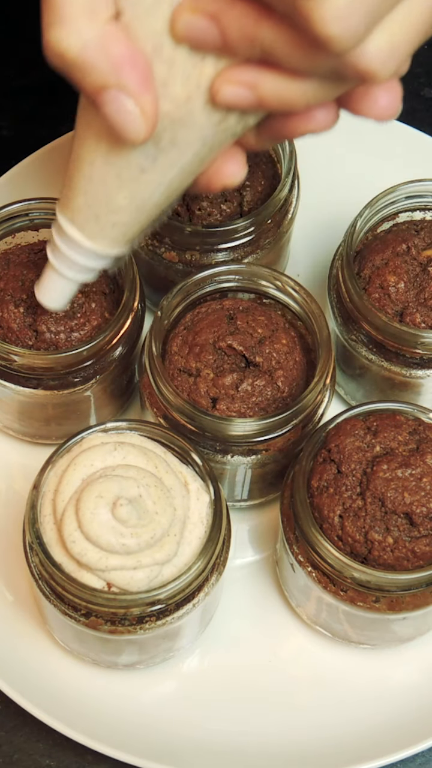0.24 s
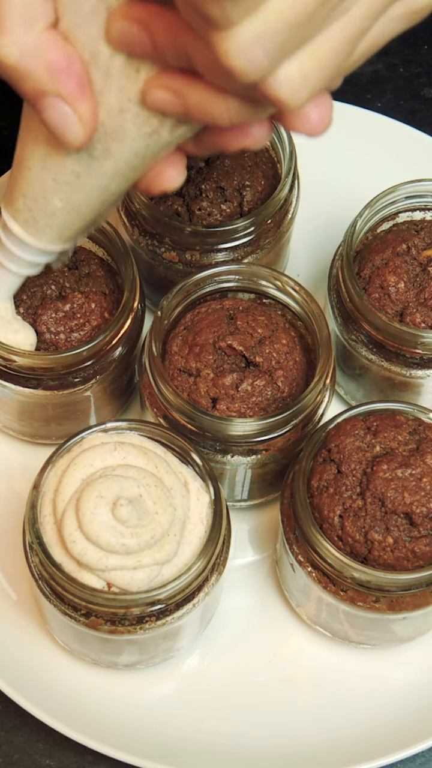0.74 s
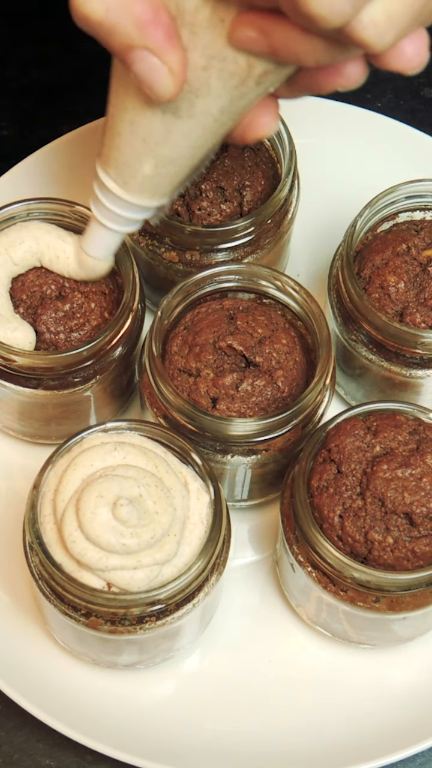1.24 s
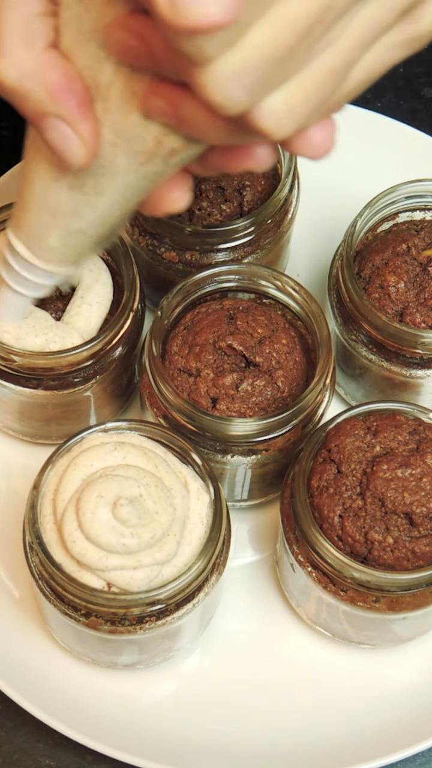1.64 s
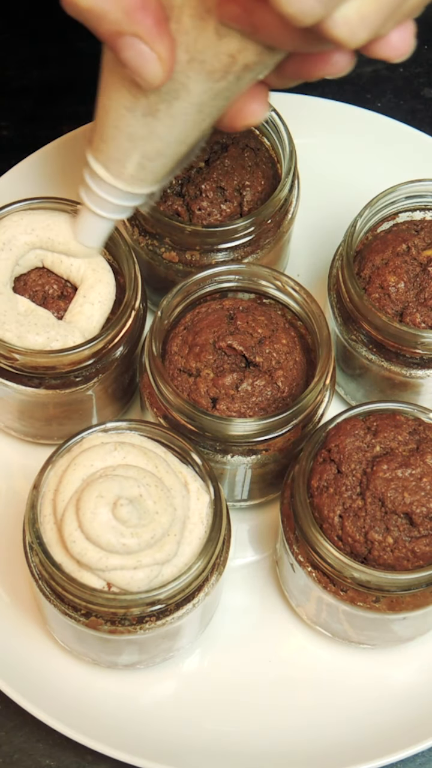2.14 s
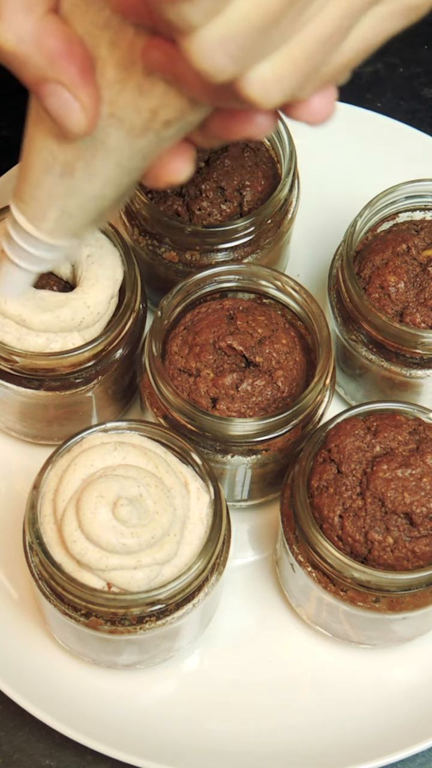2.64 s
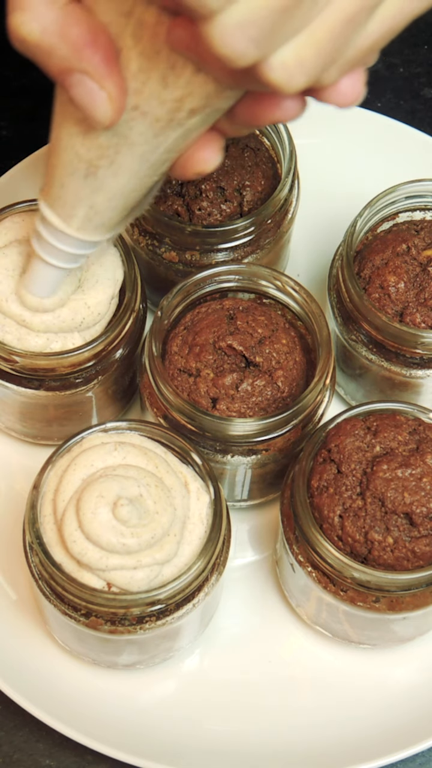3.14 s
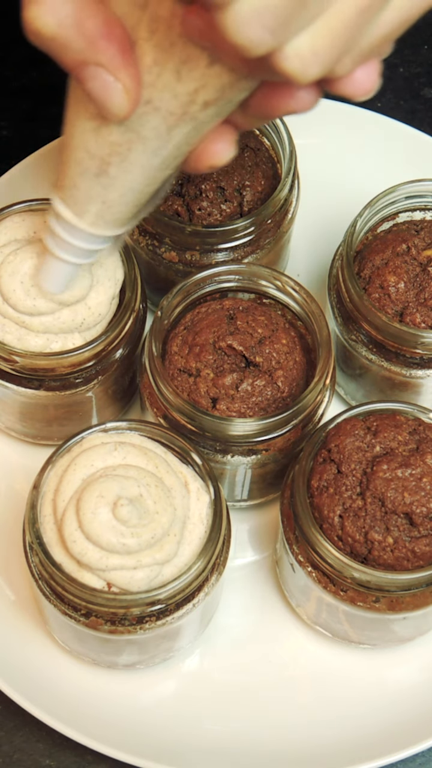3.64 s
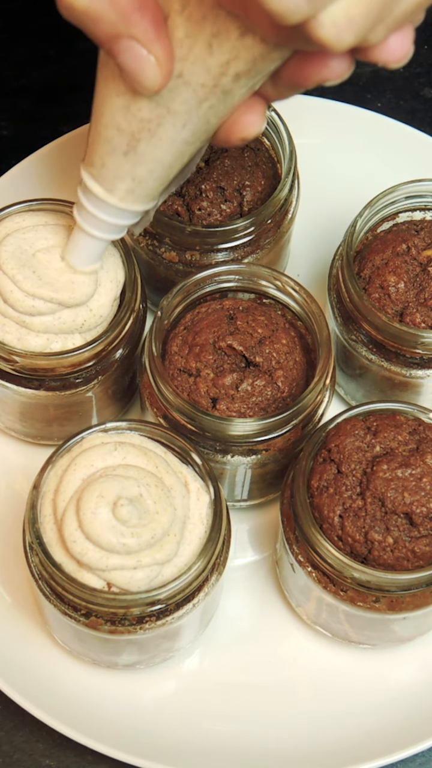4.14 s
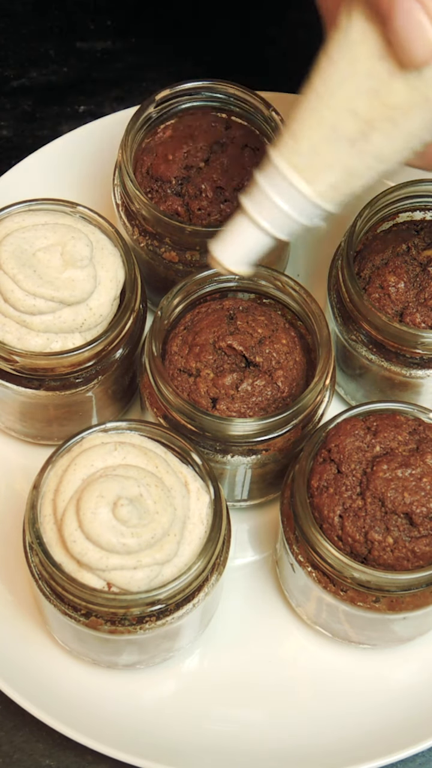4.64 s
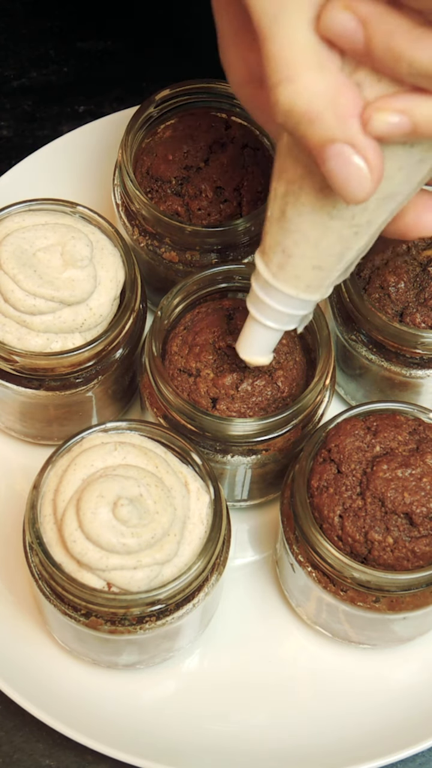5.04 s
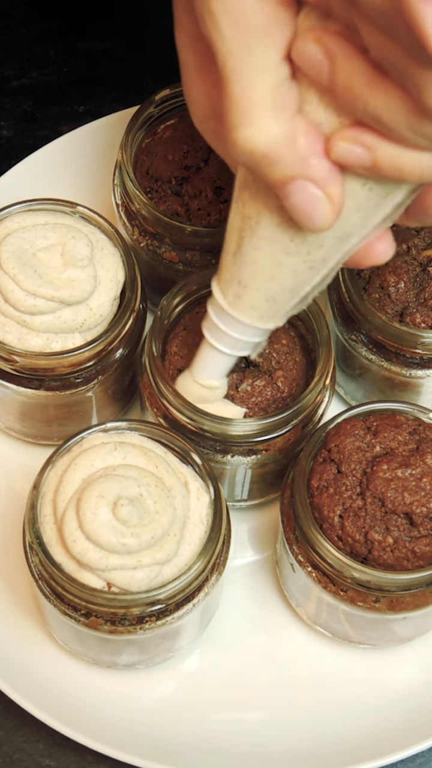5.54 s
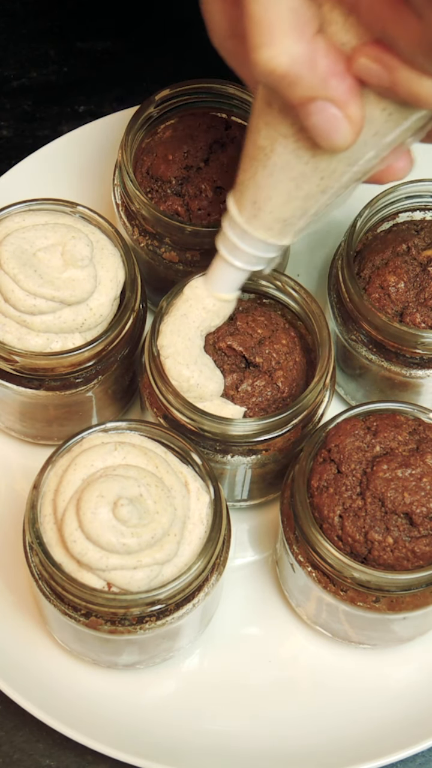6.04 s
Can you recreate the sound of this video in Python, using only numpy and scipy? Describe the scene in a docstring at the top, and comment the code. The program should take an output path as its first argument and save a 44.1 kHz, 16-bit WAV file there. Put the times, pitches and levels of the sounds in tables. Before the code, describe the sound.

A thin plastic piping bag gives small, scattered crackles as hands squeeze cream into glass jars, with faint sticky ticks in between. One sharp click stands out early, followed by a very light tap of the nozzle on glass. Past the middle the bag rustles briefly in a run of crinkles, then snaps a few more times. The microphone is close, in a quiet kitchen with a faint appliance hum and hiss.

```python
"""A thin plastic piping bag crackles as two hands squeeze cream into glass jars in a quiet kitchen.
Creases in the film buckle, singly or in rustling runs, among thin ticks, most of them from sticky cream.
Impacts excite damped modes: one sharp click rings through the room, and the nozzle taps a jar.
An appliance hums over the hiss of a close microphone pair that hears the treble more on the left."""
import sys
import numpy as np
from scipy import signal
from scipy.fft import rfft, irfft, next_fast_len
from scipy.io import wavfile

SR = 44100
rng = np.random.default_rng(int(sys.argv[2]) if len(sys.argv) > 2 else 0)


def master_out(mix):
    """Clip the mix to full scale and print it as 16-bit PCM to the path in sys.argv[1]."""
    frames = np.transpose(np.atleast_2d(mix))
    ceiling = np.clip(frames, -1, 1)
    pcm = np.round(ceiling * 32767).astype(np.int16)
    wavfile.write(sys.argv[1], SR, pcm)


N = 277389


def from_db(db):
    """Amplitude ratio of a level in decibels."""
    return 10 ** (np.asarray(db) / 20)


def at_hz(points, hz, column=1):
    """Interpolation on a log-frequency axis."""
    points = np.array(points)
    return np.interp(np.log(hz), np.log(points[:, 0]), points[:, column])


def bins(size):
    """Frequencies of a discrete Fourier transform, kept above zero."""
    return np.maximum(np.arange(size // 2 + 1) * SR / size, 1)


def noise_pair(gain, correlation, balance, size):
    """Partial coherence: left and right are the sum and difference of two independent noises."""
    hz, sides = bins(size), np.array([[1], [-1]])
    mid, side = rfft(rng.standard_normal((2, size)))
    alike = np.clip(at_hz(correlation, hz), -1, 1)
    both = np.sqrt((1 + alike) / 2) * mid + np.sqrt((1 - alike) / 2) * side * sides
    return irfft(gain * both * from_db(sides * at_hz(balance, hz) / 2), size)


def ring(x, hz, t60):
    """Damped oscillator: a unit impulse starts a decaying sine of unit amplitude."""
    r, w = from_db(-60 / (t60 * SR)), 2 * np.pi * hz / SR
    return signal.lfilter([0, np.sin(w)], [1, -2 * r * np.cos(w), r * r], x + 1e-18)


# Spectrum of room tone and hiss: f/Hz, relative level/dB
AIR_SPECTRUM = [(12, -50), (22, -24), (50, -8.5), (85, -12), (130, -4.5), (217, -7.5), (340, -10.5),
                (706, -8.5), (954, -10), (2420, -15.5), (3650, -15), (14000, -17.5)]
# Spectral peaks of the appliance: f/Hz, width/Hz, level above that spectrum/dB
HUM_PEAKS = [(97.2, 9.8, 12.5), (328.6, 16.6, 9.5), (517.6, 21, 7.5), (679, 14, 6.5), (756, 58, 6.5),
             (1164, 25, 7), (2810, 220, 7), (3076, 154, 11)]
# Balance of the background: f/Hz, left over right/dB
AIR_BALANCE = [(60, 3), (110, 0.5), (200, 1.5), (380, -0.5), (700, -8), (1280, -1.5), (2370, -3),
               (4370, -1), (8070, 2.5), (14900, -1.5)]
# Coherence of the background: f/Hz, left-right correlation
AIR_CORRELATION = [(30, 1), (130, 0.68), (300, 0.58), (700, .3), (1500, 0.42), (3000, 0.35), (14000, 0.14)]
def hum_and_hiss(level_db=-60.5, top_hz=14200):
    """Stationary noise: an appliance's hum stands as narrow peaks on a broadband floor."""
    hz = bins(N)
    hum_db = sum(db / (1 + (2 * (hz - centre) / width) ** 2) for centre, width, db in HUM_PEAKS)
    spectrum = from_db(at_hz(AIR_SPECTRUM, hz) + hum_db) * (hz < top_hz)
    noise = noise_pair(spectrum, AIR_CORRELATION, AIR_BALANCE, N)
    return from_db(level_db) * noise / noise.std()


# Hands sliding and regripping: peak t/s, level/dB, 20 dB rise/s, 20 dB fall/s
HAND_MOVES = [(.21, -58.5, .45, .16), (4.541, -46, 0.1, 0.08), (4.68, -55, 0.13, 0.05),
              (4.81, -57.5, 0.14, 0.02), (4.89, -60.5, 0.12, 0.35)]
# Spectrum of the rustling film: f/Hz, relative level/dB
RUSTLE_SPECTRUM = [(180, -36), (300, -11), (664, -3), (1060, -9.5), (1230, -3.5), (3210, -3.5),
                   (9510, -2.5), (14500, -10)]
def film_rustle(per_s=3000, spread_db=3):
    """Shot noise: dense, tiny snaps of uneven size swell and fade with each move of the hands."""
    t, envelope = np.arange(N) / SR, 0
    for peak_s, db, rise_s, fall_s in HAND_MOVES:
        distance = abs(t - peak_s) / np.where(t < peak_s, rise_s, fall_s)
        envelope += from_db(db - 20 * distance ** 1.16)
    onsets = rng.random(N) < per_s / SR
    sizes = from_db(spread_db * np.minimum(rng.exponential(1, N), 4))
    grains = onsets * sizes * rng.choice([-1, 1], N)
    noise = irfft(rfft(grains) * from_db(at_hz(RUSTLE_SPECTRUM, bins(N))), N)
    return envelope * noise / noise.std()


def around(hz, octaves, count):
    """Log-normal scatter of frequencies about a centre."""
    return hz * 2 ** (octaves * np.clip(rng.standard_normal(count), -2, 2))


def bursts(times, peak_db, hz, cycles, settle_s, settle_db, order=1):
    """Transient response: a sudden pull and dying jolts drive a resonance whose T60 lasts `cycles`."""
    out, size = np.zeros(N + SR), 600
    settling = from_db(settle_db - 60 * np.arange(size) / (settle_s * SR))
    for start, peak, centre in zip(times, from_db(peak_db), hz):
        burst = settling * rng.standard_normal(size)
        burst[0] = -1  # the pull
        for _ in range(order):  # each band-pass steepens the skirts
            burst = ring(signal.lfilter([1, 0, -1], [1], burst), centre, cycles / centre)
        out[round(start * SR):][:size] += peak * burst / abs(burst).max()
    return out[:N]


# Creases snapping: t/s, pop peak level/dB, pop f/Hz, crack over pop/dB
CREASES = [(0.663, -36, 1830, 6), (0.7127, -40, 1790, -12), (0.8819, -27.5, 1760, -8),
           (1.5548, -46, 2650, 4), (2.2412, -43, 4290, -4), (2.3509, -32.5, 2600, 6),
           (2.8962, -46, 2800, 5), (3.308, -41.5, 3440, -2), (3.395, -33.5, 2340, -3),
           (3.463, -42, 3900, -5), (3.5237, -42, 3880, 8), (4.508, -43.5, 3400, 7),
           (4.5398, -31, 3380, -11), (4.556, -37, 3500, -1), (4.5875, -36, 2000, -3),
           (4.661, -32, 3940, -2), (4.6939, -32, 1880, 1.5), (4.7784, -37.5, 1950, -15),
           (4.7986, -34.5, 3850, 0), (4.8147, -35.5, 3140, -17), (4.87, -45, 1180, -5),
           (4.879, -35.5, 3490, -7), (4.9028, -29, 3460, 5.5), (5.06, -42, 4180, -15),
           (5.159, -33.5, 3530, 3.5), (5.2112, -38.5, 2200, 10.5), (5.527, -43.5, 1610, -7),
           (5.6505, -27, 3900, -25), (5.789, -22.5, 1700, -3), (6.0729, -38, 4340, 0),
           (6.1368, -42.5, 2000, -20)]
def crease_snaps():
    """Snap-through buckling: the fold cracks, the film around it pops, the cream behind answers dully."""
    times, pop_db, pop_hz, over_db = np.transpose(CREASES)
    crack_hz = around(6140, octaves=0.13, count=len(times))
    crack = bursts(times, pop_db + over_db, crack_hz,
                   cycles=2.3, settle_s=0.0039, settle_db=-14.5, order=2)
    pop = bursts(times, pop_db, pop_hz, cycles=4.54, settle_s=0.0041, settle_db=0)
    cream_db = pop_db - 15 - 9 * np.log2(pop_hz / 2000)  # small, high folds move the cream less
    cream_hz = np.full(len(times), 750)
    cream = bursts(times, cream_db, cream_hz, cycles=2.5, settle_s=0.0051, settle_db=11)
    return crack + pop + cream


# Thin ticks; the last is a bright early reflection just after the loud snap: t/s, peak level/dB
THIN_TICKS = [(0.829, -48), (0.8435, -46), (0.9213, -45), (1.0445, -46.5), (1.1556, -41.5), (1.2687, -41.5),
              (1.333, -41.5), (1.426, -41.5), (1.5187, -46), (1.602, -47), (1.8608, -44.5), (1.895, -48),
              (1.919, -45), (1.9357, -39.5), (1.9847, -48), (1.9951, -43.5), (2.128, -49), (2.287, -47),
              (2.5783, -45), (2.7117, -46), (3.27, -40), (4.3883, -46), (4.42, -47), (4.481, -41),
              (4.4937, -37), (4.6673, -32), (4.8836, -31), (5.044, -46), (5.152, -45), (5.716, -46),
              (5.792, -32.5)]
def thin_ticks(faint_count=24):
    """Short, bright transients, mostly adhesive release of sticky cream; fainter ones fall at random."""
    times, db = np.transpose(THIN_TICKS)
    times = np.append(times, rng.uniform(0, N / SR, faint_count))
    db = np.append(db, rng.normal(-51.5, 5, faint_count))
    hz = around(8100, octaves=0.063, count=len(times))
    return bursts(times, db, hz, cycles=3.8, settle_s=0.0042, settle_db=-3.5, order=2)


def impacts(blows, modes):
    """Modal superposition: an inward force pulse drives every mode; a longer contact is duller."""
    out, ms = np.zeros(N), np.arange(4000) * 1000 / SR
    for start, level_db, tilt_db, contact_ms in blows:
        force = ms * np.exp(-ms / contact_ms)
        for hz, mode_db, t60 in modes:
            gain = from_db(level_db + mode_db + tilt_db * np.log2(hz / 2000))
            out[round(start * SR):][:len(ms)] -= gain * ring(force / force.sum(), hz, t60)
    return out


# The sharp click and a smaller one: t/s, level/dB, tilt/(dB per octave), contact time/ms
CLICK_BLOWS = [(1.7329, -13, 6.5, 0.028), (2.3507, -31.5, 11.5, 0.063)]
# A second contact and the first echoes: delay/s, relative level/dB, added tilt/(dB per octave)
CLICK_ECHOES = [(.0011, -7, -3), (.0052, -23.5, 10), (.018, -20.5, -10.5), (.031, -24.5, 4)]
# Modes of the clicking body: f/Hz, level/dB, T60/s
CLICK_MODES = [(297, -21, 0.014), (497, -1, 0.024), (960, 2, 0.0047), (2070, -0.5, 0.0011),
               (2825, -5, 0.0073), (3350, -7.5, 0.0065), (3880, -15, 0.0054), (4880, -10.5, 0.0028),
               (7160, -20, 0.0028), (9820, -15, 0.0026), (11800, -22.5, 0.0031), (13600, -26, 0.0029)]
def clicks():
    """Impulse response of a heavily damped body, followed by a second contact and early reflections."""
    repeats = [(start + delay, db + echo_db, tilt + echo_tilt, contact_ms)
               for start, db, tilt, contact_ms in CLICK_BLOWS
               for delay, echo_db, echo_tilt in CLICK_ECHOES]
    return impacts(CLICK_BLOWS + repeats, CLICK_MODES)


# Nozzle on glass: t/s, level/dB, tilt/(dB per octave), contact time/ms
NOZZLE_BLOWS = [(2.245, -33.5, 5, 0.033)]
# Modes of the jar: f/Hz, level/dB, T60/s
JAR_MODES = [(1286, -9, 0.046), (1560, -8.5, 0.04), (2205, -3.5, 0.013), (3670, -12, 0.032),
             (4530, -25, 0.036), (6370, -22, .025), (8360, -24, .03)]
def jar_tap():
    """Free vibration: struck by the nozzle, the glass rings briefly in inharmonic modes."""
    return impacts(NOZZLE_BLOWS, JAR_MODES)


# Balance of direct and reflected sound: f/Hz, left over right/dB
MIC_BALANCE = [(200, 1.5), (700, 0.5), (1600, 2.5), (4500, 4), (8000, 9), (14500, -2)]
# Coherence of the worktop's scatter: f/Hz, left-right correlation
SCATTER_CORRELATION = [(300, .9), (2000, 0.43), (5000, -0.08), (12000, -0.57)]
# Coherence of the reverberation: f/Hz, left-right correlation
TAIL_CORRELATION = [(60, 1), (180, 0.99), (540, 0.99), (1640, 0.85), (4940, 0.22), (14900, 0.13)]
# Reverberation by band: f/Hz, level/dB, T60/s
TAIL_BANDS = [(100, -10.5, 0.79), (300.25, -6, 0.66), (796, -4.5, 0.59), (2050, -9.5, 0.46),
              (5060, -7, 0.38), (12033, -10.5, 0.25)]
def kitchen(hits, bag, onset_s=0.002, scatter_s=0.00089, scatter_db=-3.5, left_lag_s=2e-5):
    """Convolution with the room: direct sound, early scatter and a diffuse tail dying band by band."""
    t, hz, tail = np.arange(SR) / SR, bins(SR), 0
    for centre in 63 * 2 ** np.arange(0, 8.5, 0.5):
        band = np.maximum(1 - 4 * np.log2(hz / centre) ** 2, 0)
        noise = noise_pair(band, TAIL_CORRELATION, MIC_BALANCE, SR)
        t60 = at_hz(TAIL_BANDS, centre, column=2)
        decay = from_db(-60 * t / t60) / np.sqrt(t60 * SR / np.log(1e6))  # unit energy
        tail += noise * from_db(at_hz(TAIL_BANDS, centre)) * decay
    tail *= np.clip(t / onset_s, 0, 1) ** 2
    # Plate, jars and worktop scatter mostly treble, just after the direct sound.
    swell = t ** 2 * np.exp(-t / scatter_s)
    scatter = noise_pair(hz / np.hypot(hz, 4000), SCATTER_CORRELATION, MIC_BALANCE, SR)
    scatter *= from_db(scatter_db) * swell / np.linalg.norm(swell)
    size = next_fast_len(N + SR)
    # The hands are a little nearer the right microphone.
    lag = np.exp(-2j * np.pi * bins(size) * np.array([[left_lag_s], [0]]))
    direct = lag * from_db(np.array([[0.5], [-0.5]]) * at_hz(MIC_BALANCE, bins(size)))
    early = rfft(hits + bag, size) * (direct + rfft(scatter, size))
    # Close and shielded by the hands, the bag excites the room less.
    late = rfft(hits + from_db(-2.5) * bag, size) * rfft(tail, size)
    return irfft(early + late, size)[:, :N]


def scene(bass_cut_hz=146):
    """Superposition: bag and impacts sound through the kitchen, over the steady background."""
    bag = crease_snaps() + thin_ticks() + film_rustle()
    # Small bodies radiate no deep bass.
    highpass = signal.butter(4, bass_cut_hz, "high", fs=SR, output="sos")
    hits = signal.sosfilt(highpass, clicks() + jar_tap())
    return kitchen(hits, bag) + hum_and_hiss()


def record(dry, stop_hz=15493):
    """Band limiting: a steep low-pass filter removes the highest treble."""
    return signal.sosfilt(signal.cheby2(12, 70, stop_hz, fs=SR, output="sos"), dry)


dry = scene()
out = record(dry)
master_out(out)
```